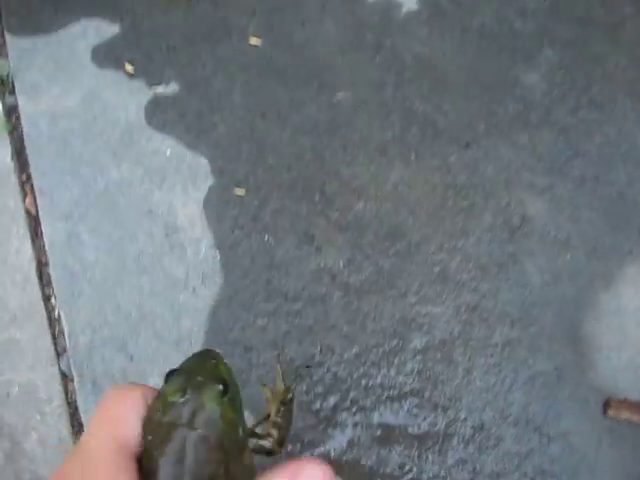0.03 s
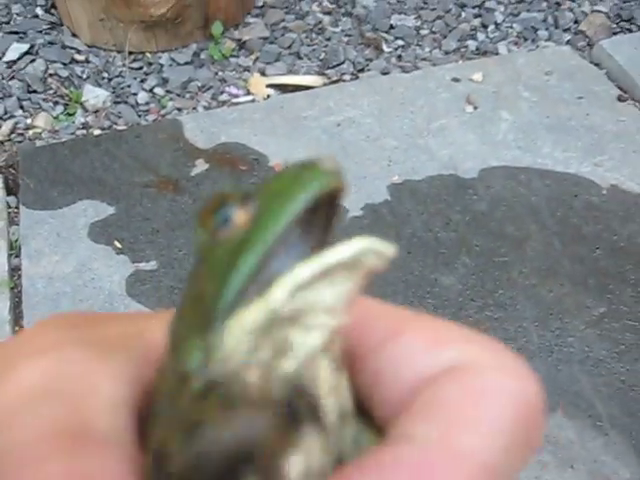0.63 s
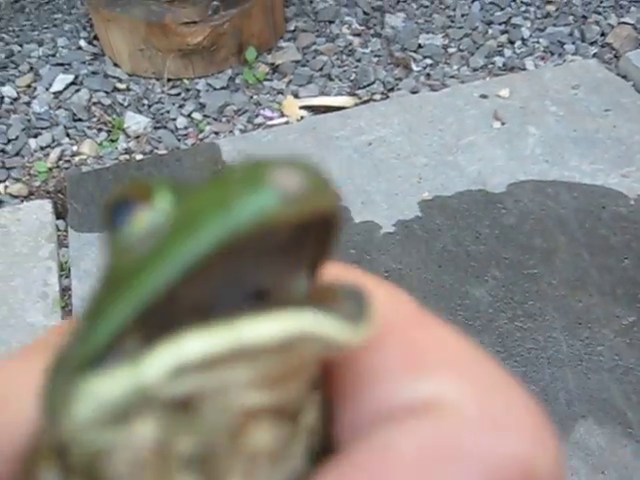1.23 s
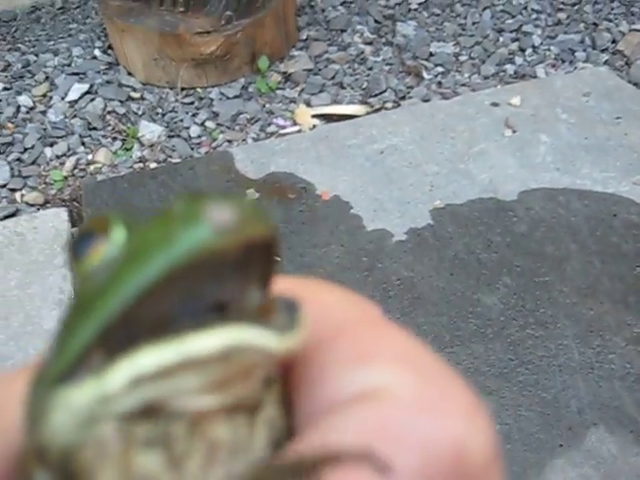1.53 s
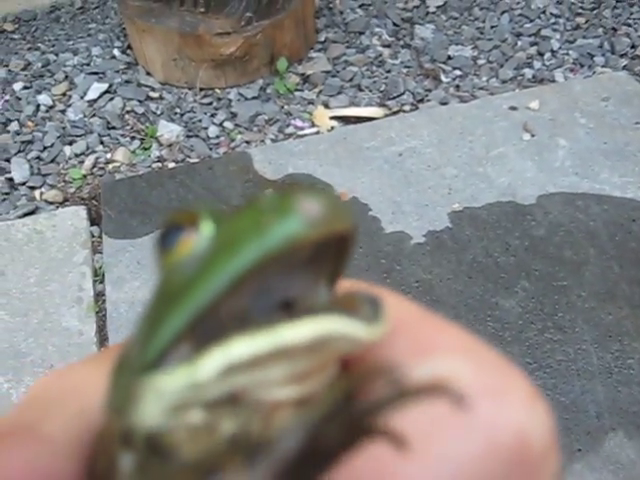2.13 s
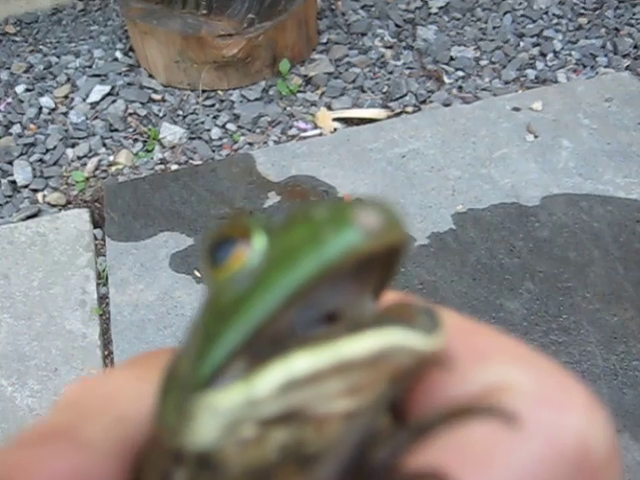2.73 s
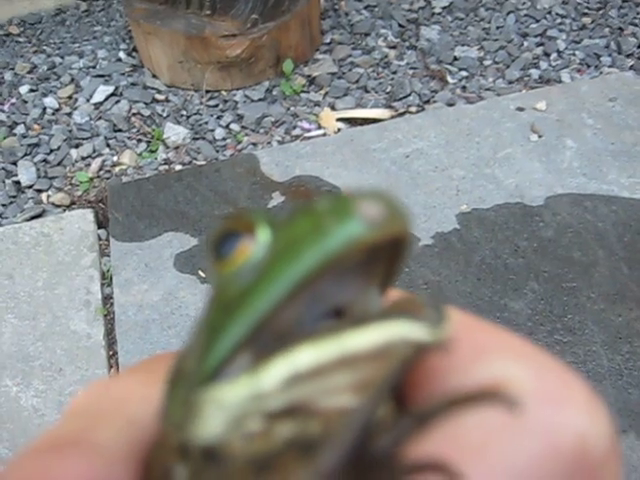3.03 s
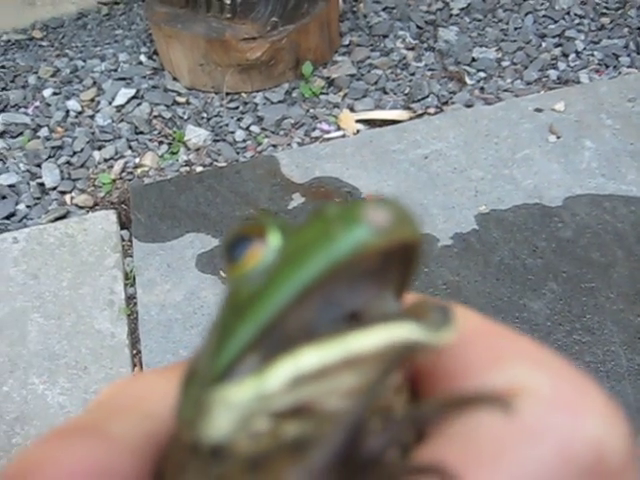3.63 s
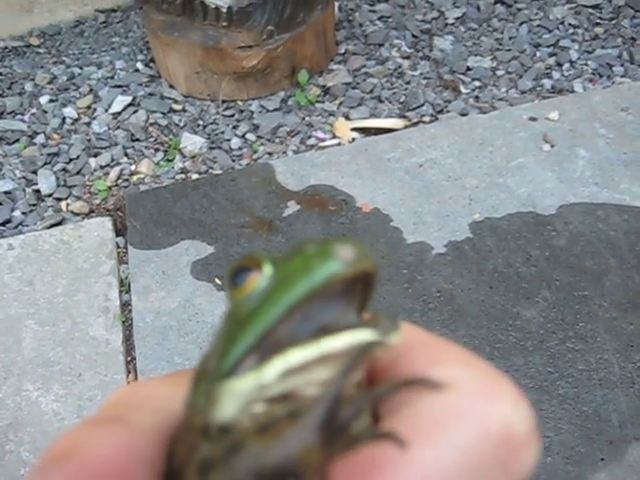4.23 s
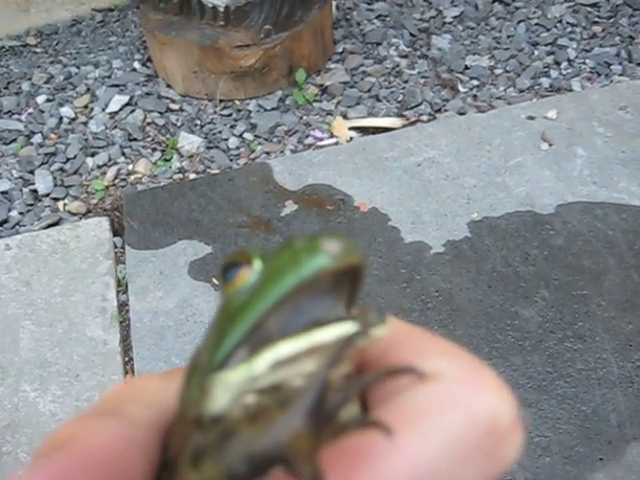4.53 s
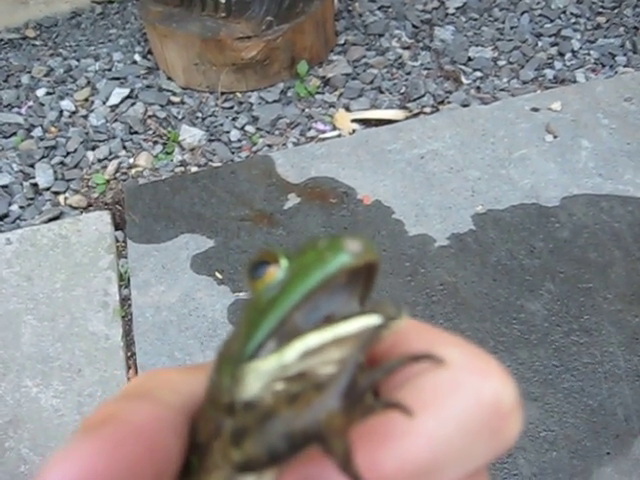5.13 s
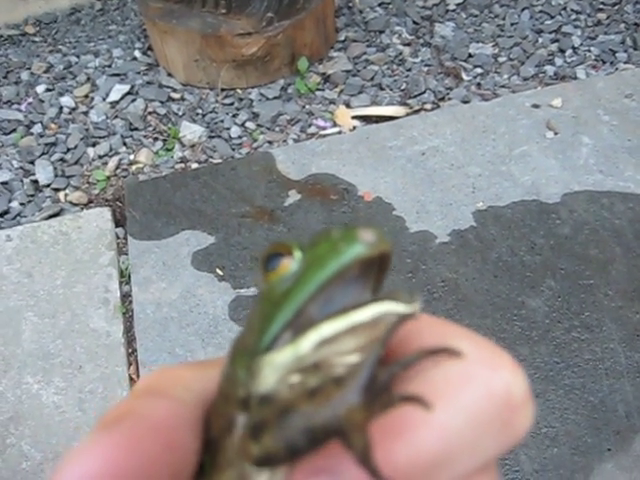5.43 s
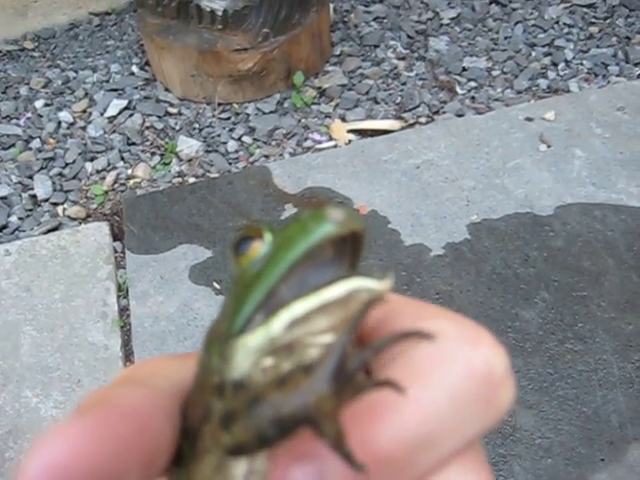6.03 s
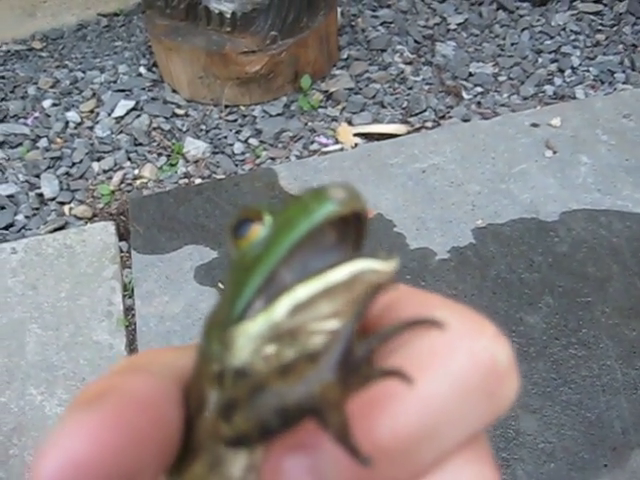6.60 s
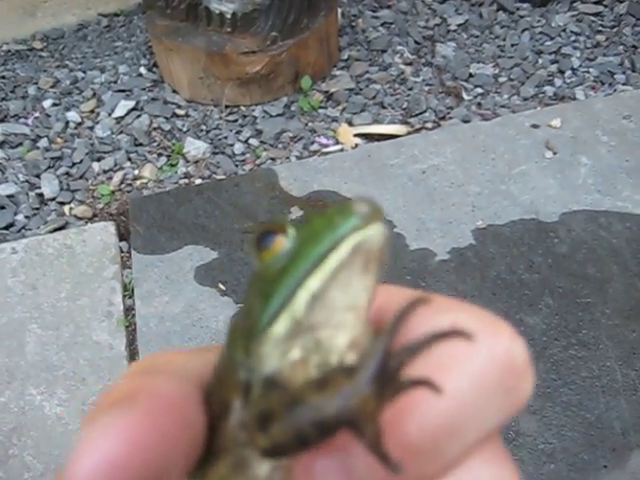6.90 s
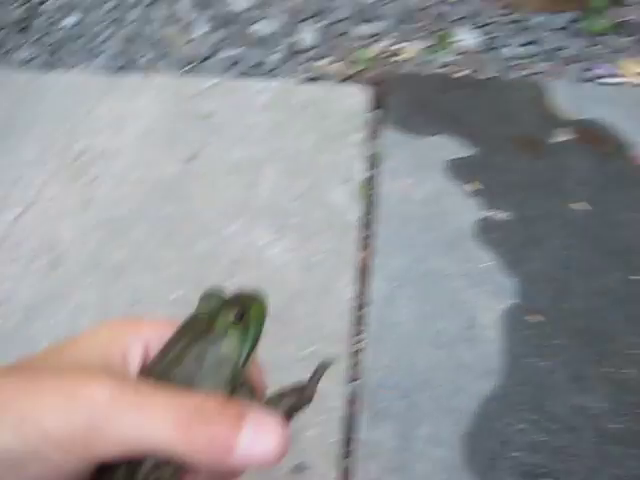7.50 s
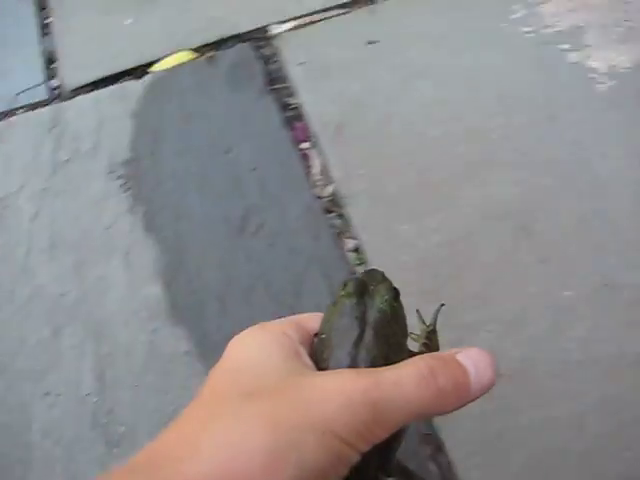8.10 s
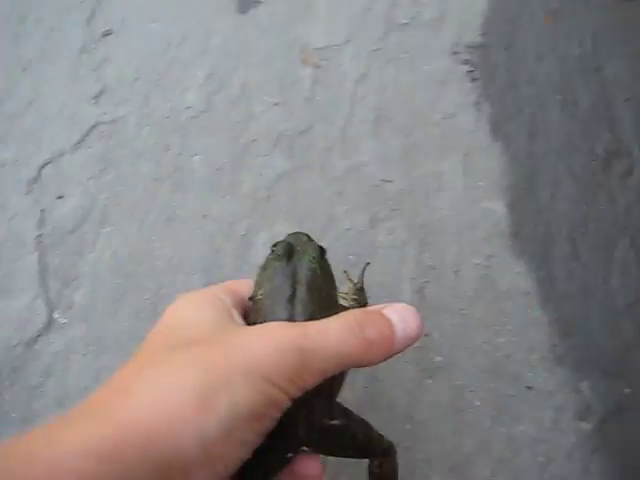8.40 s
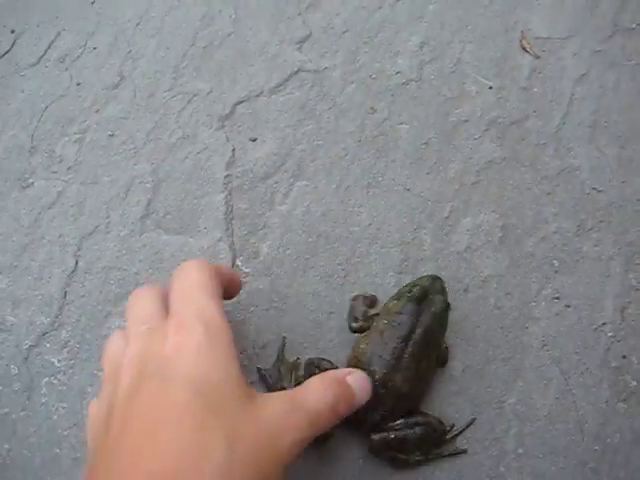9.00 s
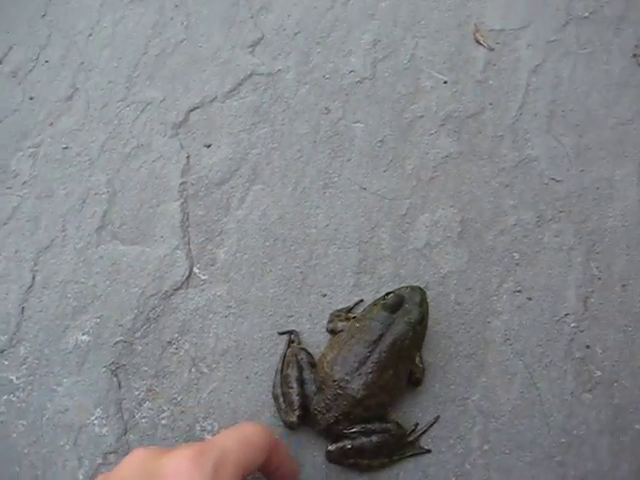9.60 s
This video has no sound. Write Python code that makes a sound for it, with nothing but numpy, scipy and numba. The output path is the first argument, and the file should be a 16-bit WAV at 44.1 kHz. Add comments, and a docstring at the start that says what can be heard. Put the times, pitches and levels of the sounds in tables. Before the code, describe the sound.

A frog held close to the microphone screams loudly from the start, outdoors with almost no echo. Until about 1.8 seconds it is a shrill, wavering wail broken by short rasps. Surging yelps follow, each arching up in pitch, loudest between 2 and 2.7 seconds. From about 3 seconds the cry becomes a lower, buzzing rattle. It lifts again around 5.5 seconds, gives a few quick yelps after 6, sags to a creak and ends in a thin squeak at 6.5 seconds. Faint open-air hiss and a low drone remain. From 7 seconds shoes scuff on stone slabs with small cracks of grit. Between 8.2 and 8.7 seconds the microphone takes a cluster of dull knocks with a low handling rumble. A brief, sharper scrape comes at about 9.3 seconds, along with a few more soft bumps.

```python
"""A hand-held frog screams close to a camera on a stone patio, over open air and a low drone.
Its larynx snaps in a pulse train that rings the throat: first a wail broken by rasps, from 1.8 s
surging yelps, then a rattle that sags to a creak and ends in a squeak at 6.5 s.
From 7 s shoes scuff the slabs; from 8.2 s the camera is bumped as the frog is set down."""
import sys
import numpy as np
from scipy import signal
from scipy.io import wavfile
from scipy.ndimage import uniform_filter1d
from numba import njit

SR = 44100
rng = np.random.default_rng(int(sys.argv[2]) if len(sys.argv) > 2 else 0)


def materialize(psi):
    """Save the field psi as 16-bit PCM at rate SR to the path in sys.argv[1].

    A 1-D psi becomes a single channel; in a 2-D psi each row is a channel.
    """
    bounded = np.clip(np.atleast_2d(psi).T, -1, 1)
    quanta = np.round(bounded * 32767).astype(np.int16)
    wavfile.write(sys.argv[1], SR, quanta)


N = 429975
TIME = np.arange(N) / SR


def amp(db):
    """Decibels to gain."""
    return 10 ** (np.asarray(db) / 20)


def unit(x):
    """Scale to rms 1."""
    return x / np.sqrt(np.mean(x ** 2) + 1e-20)


def curves(rows):
    """Each column of a time table, at every sample."""
    times, *columns = np.transpose(rows)
    return [np.interp(TIME, times, column) for column in columns]


def colour(x, spectrum):
    """Minimum-phase filter from (frequency [Hz], gain [dB]) points."""
    hz, db = np.transpose(spectrum)
    bins_hz = abs(np.fft.fftfreq(4096, 1 / SR))
    log_gain = np.log(amp(np.interp(np.log(bins_hz + 1), np.log(hz), db)))
    taps = np.fft.ifft(np.exp(np.conj(signal.hilbert(log_gain)))).real
    return signal.oaconvolve(x, taps[:len(taps) // 2])[:N]


def noise(spectrum):
    """Coloured noise, rms 1."""
    return unit(colour(rng.standard_normal(N), spectrum))


def wander(per_s):
    """Random drift, rms 1."""
    return unit(np.interp(TIME * per_s, np.arange(N), rng.standard_normal(N)))


def tone(hz):
    """Sine following a frequency curve."""
    return np.sin(2 * np.pi * np.cumsum(hz) / SR)


@njit
def one_pole(x, pole):
    """Time-varying complex one-pole filter, real part."""
    out, state = np.zeros(len(x)), 0j
    for i in range(len(x)):
        state = pole[i] * state + x[i] + 1e-18
        out[i] = state.real
    return out


def resonate(x, hz, width_hz):
    """Moving resonance, peak gain about 1."""
    radius = np.exp(-np.pi * abs(width_hz) / SR)
    return 2 * one_pole((1 - radius) * x, radius * np.exp(2j * np.pi * hz / SR))


def steady(x, band_hz, window=1200):
    """Hold the running in-band rms at 1."""
    band = signal.sosfilt(signal.butter(3, band_hz, "band", fs=SR, output="sos"), x)
    power = abs(uniform_filter1d(uniform_filter1d(band ** 2, window), window))
    return x / np.sqrt(power + 1e-4 * power.mean())


def clicks(times_s, sizes):
    """Band-limited impulses at exact times."""
    at = np.floor(times_s * SR).astype(int)[:, None] + np.arange(-8, 9)
    offset = at - times_s[:, None] * SR
    shape = np.sinc(offset) * np.cos(np.pi * offset / 18) ** 2
    return np.bincount(np.clip(at, 0, N - 1).ravel(), (sizes[:, None] * shape).ravel(), N)


# Air hiss (time [s], level [dB])
AIR_LEVEL = [(0, -42.5), (.5, -65), (2, -70), (4, -53), (6.5, -57.5), (7.5, -48.5), (8.7, -44),
             (9.75, -47.5)]
# Air spectrum (frequency [Hz], gain [dB])
AIR_SPECTRUM = [(35, -35), (60, -5.5), (108, -9), (338, -13), (389, -12.5), (1310, -12.5), (1740, -12.5),
                (3040, -17.5), (11000, -25.5), (14900, -31), (16000, -39)]


def open_air():
    """Broad outdoor hiss, low under the wail."""
    return amp(curves(AIR_LEVEL)[0]) * noise(AIR_SPECTRUM)


# Low background drone, rising from about 4 s and dipping briefly at 5.55 s (time [s], base level [dB])
LOW_DRONE_LEVEL = [(.1, -56), (.6, -80), (1.7, -69.5), (2.4, -64.5), (3, -65), (4.2, -52.5), (5.3, -50),
                   (5.55, -67), (6, -50.5), (7.4, -50.5), (8.1, -42), (8.42, -48.5), (8.55, -60)]
# Drone spectrum (frequency [Hz], gain [dB])
LOW_DRONE_SPECTRUM = [(20, -7.5), (75, -5), (110, -11), (170, -5), (300, -9.5), (380, -2.5), (440, 2),
                      (540, -4), (900, -6.5), (1300, -4.5), (2200, -7.5), (2500, -6.5), (2650, -3.5),
                      (2900, -9), (5000, -9.5), (12000, -20.5)]


def low_drone(rumble_db=4.5, hum_hz=73.3, hum_db=-11):
    """Background rumble plus an unsteady hum."""
    hum = amp(hum_db + 2 * wander(8.9)) * tone(hum_hz * (1 + .04 * wander(9.2)))
    rumble = amp(rumble_db) * noise(LOW_DRONE_SPECTRUM)
    return amp(curves(LOW_DRONE_LEVEL)[0]) * (rumble + hum)


def camera_whine(hz=15140, drift_hz=18, level_db=-65):
    """The camera's thin, wavering tone."""
    return amp(level_db) * tone(hz + drift_hz * wander(60))


# Grip rumble (time [s], level [dB])
GRIP_LEVEL = [(8.15, -90), (8.23, -42.5), (8.75, -44.5), (9.05, -58), (9.27, -44.5), (9.5, -54.5)]
# Rumble spectrum (frequency [Hz], gain [dB])
GRIP_SPECTRUM = [(20, -12), (55, 1), (115, 2), (200, -8), (350, -34), (800, -60)]
# Hand knocks (time [s], peak [dB], settled pitch [Hz])
KNOCKS = [(8.254, -30, 90), (8.333, -27, 139), (8.35, -21, 85), (8.404, -25, 175), (8.468, -25, 111),
          (8.512, -21.5, 138), (8.521, -23, 169), (8.597, -26, 130), (8.627, -26, 114), (8.675, -30, 120),
          (9.223, -34, 119), (9.408, -29, 125), (9.446, -24, 120)]


def handling(rise_s=0.0028, sag=0.4):
    """Heavily damped knocks of the camera body over the rumble of the grip."""
    out = amp(curves(GRIP_LEVEL)[0] + 1.9 * wander(25)) * noise(GRIP_SPECTRUM)
    for start_s, db, hz in KNOCKS:
        t = np.clip(TIME - start_s, 0, .1)
        swell = t / rise_s * np.exp(1 - t / rise_s)
        cycles = hz * (t + sag * rise_s * (1 - np.exp(-t / rise_s)))
        out += amp(db) * swell * np.sin(2 * np.pi * cycles)
    return out


# Soles and clothes sliding (peak time [s], swell [s], fade [s], level [dB])
SLIDES = [(7.15, 0.052, 0.1, -41), (7.47, 0.047, 0.095, -43.5), (7.61, 0.034, .04, -31),
          (7.72, 0.067, 0.12, -30.5), (7.985, 0.16, 0.052, -30), (8.22, 0.19, 0.15, -38),
          (8.42, 0.069, 0.027, -44.5), (8.78, 0.12, .02, -42), (8.98, 0.11, .05, -49.5),
          (9.283, 0.045, 0.021, -22.5), (9.46, .03, .03, -49)]
# Grit cracks (time [s], level [dB])
CRACKS = [(7.703, -29), (8.335, -38), (8.43, -32), (8.737, -47)]
# Friction spectrum (frequency [Hz], gain [dB])
SCUFF_SPECTRUM = [(530, -52), (900, -13.5), (1920, -3), (2860, -7.5), (3340, -1.5), (5890, 0.5),
                  (8660, -3.5), (9530, -5.5), (13700, -7.5), (15100, -12), (16000, -25)]


def scuffs(grain_db=1.5, lumps_db=1.75, crack_decay_s=0.0018):
    """Swells of sliding friction, with grit cracking underfoot."""
    power = np.zeros(N)
    for peak_s, swell_s, fade_s, db in SLIDES:
        width_s = np.where(TIME < peak_s, swell_s, fade_s)
        power += (amp(db) * np.exp(-((TIME - peak_s) / width_s) ** 2)) ** 2
    sliding = np.sqrt(power) * amp(grain_db * wander(900) + lumps_db * wander(60))
    grit = sum(amp(db) * (TIME > s) * np.exp(-abs(TIME - s) / crack_decay_s) for s, db in CRACKS)
    return (sliding + grit) * noise(SCUFF_SPECTRUM)


def patio(x, slab_delay_s=.0023, slab_db=-23, tail_db=-27, t60_s=0.2):
    """Direct sound, one slab reflection and a faint tail."""
    t = TIME[:SR // 2]
    response = rng.standard_normal(len(t)) * amp(-60 * t / t60_s) * (t > .004)
    tail = signal.oaconvolve(x, response / np.linalg.norm(response))[:N]
    echo = np.interp(TIME - slab_delay_s, TIME, x)
    return x + amp(slab_db) * echo + amp(tail_db) * tail


# Squeak partials (harmonic [n], level [dB], t60 [s])
SQUEAK_PARTIALS = [(1, -29.5, 0.13), (2, -37, 0.13), (3, -32, 0.11), (4, -28, 0.078)]


def squeak(start_s=6.484, hz=1275, bend=0.15, settle_s=0.012, attack_s=0.0022):
    """The folds ring on as a thin tone that bends up and dies."""
    t = np.maximum(TIME - start_s, 0)
    pitch_hz = hz * (1 - bend * np.exp(-t / settle_s))
    partials = sum(amp(db - 60 * t / t60_s) * tone(k * pitch_hz) for k, db, t60_s in SQUEAK_PARTIALS)
    return np.minimum(t / attack_s, 1) * partials


# Yelps (start [s], length [s], pitch lift [octaves], level lift [dB])
SQUEEZES = [(1.808, 0.227, 0.99, 5.5), (2.088, 0.281, 1.25, 11.5), (2.385, 0.314, 1.21, 12),
            (2.792, 0.199, 0.46, 1.5), (3.014, 0.174, 0.21, 2), (5.283, 0.444, 0.61, 0.5),
            (6.018, 0.159, 0.96, 4.5), (6.113, 0.23, 1.42, 5.9), (6.369, 0.135, 1.73, 6.5)]


def yelps(skew=1.466, pitch_power=.911, level_power=0.66):
    """Extra squeezes lift pitch and level in arches; pitch peaks late."""
    octaves, db = np.zeros(N), np.zeros(N)
    for start_s, length_s, lift_octaves, lift_db in SQUEEZES:
        inside = (TIME > start_s) & (TIME < start_s + length_s)
        progress = (TIME[inside] - start_s) / length_s
        octaves[inside] += lift_octaves * np.sin(np.pi * progress ** skew) ** pitch_power
        db[inside] += lift_db * np.sin(np.pi * progress) ** level_power
    return octaves, db


# Rasps (start [s], end [s])
RASP_SPANS = [(.303, .328), (.392, .408), (.463, .517), (.628, .67), (.715, .77), (.83, .885), (.926, .95),
              (1.018, 1.044), (1.06, 1.087), (1.275, 1.323), (1.412, 1.46), (1.53, 1.55), (1.608, 1.629),
              (1.76, 1.795), (1.888, 1.927), (2.21, 2.226), (2.556, 2.575)]


def fold_chaos(share=0.7):
    """Chaotic share of the treble as the folds break into rasps."""
    rasping = sum(1. * ((TIME > start_s) & (TIME < end_s)) for start_s, end_s in RASP_SPANS)
    return share * uniform_filter1d(rasping, size=250)


# Base snap rate, set by larynx tension (time [s], rate [Hz])
SNAP_RATE = [(.005, 511), (.108, 316), (.126, 378), (.194, 442), (.204, 371), (.312, 748), (.415, 685),
             (.507, 502), (.617, 515), (.675, 585), (.835, 480), (.917, 398), (.95, 443), (1.022, 449),
             (1.056, 380), (1.135, 512), (1.28, 445), (1.335, 398), (1.365, 402), (1.44, 364), (1.468, 372),
             (1.528, 338), (1.602, 360), (1.643, 323), (1.812, 294), (2.04, 223), (2.315, 154), (2.73, 158),
             (3.04, 237), (3.3, 185), (3.55, 151), (3.79, 173), (3.863, 159), (4.11, 164), (4.212, 153),
             (4.472, 154), (4.561, 120), (4.65, 146), (5.12, 147), (5.21, 170), (5.29, 148), (5.48, 187),
             (5.62, 190), (5.8, 212), (5.944, 159), (6.009, 93), (6.177, 120), (6.353, 51), (6.49, 95)]
# Snap unevenness (time [s], period spread [ratio])
JITTER = [(.25, .015), (.34, .004), (3.2, .004), (3.6, .018), (4.4, .012), (4.6, .04), (5.4, .035),
          (5.5, .004), (6.1, .02), (6.35, .005)]
# Second closure in each cycle (time [s], lag [s], size [ratio])
SECOND_SNAP = [(.1, 0.00088, 0.24), (.2, .0012, 0.23), (.28, 0.00074, 0.0053), (6.45, .0014, 0.014),
               (6.465, 0.0014, 0.83)]


def larynx(lift_octaves, chaos, glide_s=0.012, quaver=.005, rasp_sag=.015, shimmer=5.6,
           lone_snap_s=6.359, scatter_s=0.000102, hiss_db=-25, rasp_from_hz=4500):
    """The folds snap shut and air puffs through; returns bare snaps, airy snaps and rasp."""
    (jitter,), (lag_s, rebound) = curves(JITTER), curves(SECOND_SNAP)
    sounding = TIME < SNAP_RATE[-1][0]
    rate_hz = uniform_filter1d(curves(SNAP_RATE)[0], int(glide_s * SR)) * 2 ** lift_octaves
    rate_hz *= (1 + quaver * wander(28)) * (1 - rasp_sag * chaos)
    cycles = np.cumsum(rate_hz * (1 + jitter * (wander(200) + .25 * wander(14)))) / SR
    cycles -= np.interp(lone_snap_s, TIME, cycles) % 1  # one snap lands at the bottom of the creak
    times_s = np.interp(np.arange(1, cycles[sounding][-1]), cycles, TIME)
    at = (times_s * SR).astype(int)
    puffs = np.exp(-2 * (cycles % 1)) * 2 * rng.standard_normal(N) * sounding
    spread, slip = rng.standard_normal((N, 2))[:len(at)].T
    sizes = np.exp(shimmer * jitter[at] * np.tanh(spread)) / np.sqrt(rate_hz[at] / SR)
    snaps = clicks(times_s, sizes) + clicks(times_s + lag_s[at], sizes * rebound[at])
    # rasp: the cycle keeps time, the treble is struck out of step
    stray = clicks(times_s + scatter_s * slip, sizes) + 0.92 * puffs
    highpass = signal.butter(6, rasp_from_hz, "high", fs=SR, output="sos")
    rasp = signal.sosfiltfilt(highpass, chaos * (stray - snaps) + 1e-18)
    return snaps, snaps + amp(hiss_db) * puffs, rasp


# Open-mouth resonance (time [s], centre [Hz], width per stage [Hz])
THROAT_RESONANCE = [(0, 2920, 703), (.1, 3980, 900), (.18, 4550, 1350), (.33, 5000, 1800), (.6, 4930, 1130),
                    (1.2, 5180, 1510), (2.3, 5115, 1468), (2.9, 4830, 1725), (3.6, 5300, 2033),
                    (4.6, 5690, 1501), (5.3, 5600, 1600), (5.48, 4740, 2290), (5.7, 4840, 2500),
                    (5.87, 5470, 1520), (6.22, 4500, 2580)]
# Ring spectrum (frequency [Hz], gain [dB])
RING_SPECTRUM = [(400, -61), (1500, -8.5), (2600, 0.5), (3500, 4.5), (4500, 3), (5600, 3), (6100, -4),
                 (6700, -9.5), (9000, -14)]


def throat(pulses, shut, shut_hz=5010, shut_width_hz=990):
    """Two-stage throat resonance; shutting the mouth narrows it."""
    open_hz, open_width_hz = curves(THROAT_RESONANCE)
    hz = open_hz + shut * (shut_hz - open_hz)
    width_hz = open_width_hz + shut * (shut_width_hz - open_width_hz)
    ring = resonate(resonate(pulses, hz, width_hz), hz, width_hz)
    return steady(colour(ring, RING_SPECTRUM), (3000, 6500))


# Treble relative to effort, mouth open (time [s], edge [dB], sizzle [dB])
TREBLE_LEVELS = [(0, -13, -7.5), (.2, -6, -9.5), (.48, -6, -4.5), (.66, -16, -16.5), (1.5, -19.5, -15.5),
                 (2.7, -19, -14), (3.4, -15.5, -11), (5.2, -14, -9.5), (5.72, -14, -8), (6.1, -13.5, -12),
                 (6.24, -14.5, -9.5), (6.49, -13, -14)]
# Edge spectrum (frequency [Hz], gain [dB])
EDGE_SPECTRUM = [(3000, -66), (5500, -4), (6600, -3.5), (7600, 1), (8400, -1.5), (9400, 0), (10200, -1.5),
                 (11000, -3.5), (13000, -14)]
# Sizzle spectrum (frequency [Hz], gain [dB])
SIZZLE_SPECTRUM = [(8000, -63), (11000, -28), (11700, -0.5), (12400, 7.5), (12900, 2), (13600, -1),
                   (14500, -9), (15400, -7.5), (16500, -6)]


def treble(pulses, shut, notch_hz, notch_width_hz, peak_hz=10040, drift_hz=350,
           flat_at_db=-15, flicker_db=0.7, shut_db=-8):
    """Bright edge and top sizzle of the voice, notched and dulled as the mouth shuts."""
    for multiple in (1.72, 2.54, 3.15):
        pulses = pulses - shut * resonate(pulses, multiple * notch_hz, notch_width_hz)
    edge_db, sizzle_db = curves(TREBLE_LEVELS)
    boost = np.clip(.12 * (edge_db - flat_at_db), -1, 1)  # strong edge: peak; weak edge: hollow
    pulses = pulses + boost * resonate(pulses, peak_hz + drift_hz * wander(4), width_hz=1000)
    edge = amp(edge_db + flicker_db * wander(12)) * steady(colour(pulses, EDGE_SPECTRUM), (7000, 10500))
    sizzle = amp(sizzle_db) * steady(colour(pulses, SIZZLE_SPECTRUM), (11500, 15500))
    return amp(shut_db * shut ** 2) * (edge + sizzle)


# Lung push (time [s], base ring level [dB])
LUNG_EFFORT = [(0, -33.5), (.08, -23.5), (.28, -22), (.47, -29.5), (.53, -25.5), (.72, -23.5), (.9, -24.5),
               (1.18, -19.5), (1.8, -26.5), (1.98, -24), (2.06, -28.5), (2.38, -30.5), (2.74, -30.5),
               (2.8, -22.5), (3.04, -24), (4.7, -24), (5.35, -22), (5.6, -26.5), (5.7, -30), (5.91, -22),
               (6.04, -28.5), (6.12, -25.5), (6.25, -31), (6.38, -31.5), (6.49, -28.5)]
# Mouth closure (time [s], shut [0-1])
MOUTH_SHUT = [(3.5, 0.19), (4.7, 0.42), (5.1, 0.49), (5.33, 0.91), (5.45, 0.02), (5.88, 0.07), (6, 1),
              (6.11, 0.91), (6.19, 0.38), (6.27, 0.4), (6.32, 0.95), (6.49, 1)]
# Dry snap, growing from wail to rattle (time [s], base level [dB])
DRY_SNAP_LEVEL = [(0.0, -42.5), (0.32, -43), (0.4, -48.5), (0.7, -49.5), (1.16, -48), (1.63, -50.5),
                  (1.68, -53.5), (1.97, -45.5), (2.02, -49), (2.24, -42.5), (2.37, -47), (2.44, -38.5),
                  (2.69, -47.5), (2.78, -37), (2.96, -44), (3.54, -34), (5.39, -31), (5.48, -40.5),
                  (6.14, -31), (6.36, -40.5), (6.44, -28), (6.49, -36.5)]
# Dry snap spectrum (frequency [Hz], gain [dB])
DRY_SNAP_SPECTRUM = [(100, -29.5), (450, -30), (620, -13.5), (780, -7), (1300, -4), (2100, -1.5),
                     (3500, 2.5), (4400, -1.5), (6000, -18), (9000, -22.5)]


def scream(tremble_db=0.74, snap_trim_db=0.2, db_per_chaos=-2.5,
           notch_open_hz=5120, notch_shut_hz=3310, notch_width_hz=1290, notch_depth=0.96):
    """Lung-driven larynx snaps, heard dry, through the ringing throat and as bright treble."""
    lift_octaves, lift_db = yelps()
    effort_db = curves(LUNG_EFFORT)[0] + lift_db + tremble_db * wander(30)
    shut = curves(MOUTH_SHUT)[0]
    chaos = fold_chaos()
    snaps, airy, rasp = larynx(lift_octaves, chaos)
    ring = amp(db_per_chaos * chaos) * throat(airy + rasp, shut)
    snap_db = curves(DRY_SNAP_LEVEL)[0] + snap_trim_db - effort_db
    body = ring - amp(snap_db) * steady(colour(snaps, DRY_SNAP_SPECTRUM), (700, 2500))
    # the closing jaw drags a row of notches down the spectrum
    notch_hz = notch_open_hz + shut * (notch_shut_hz - notch_open_hz)
    body -= notch_depth * shut * resonate(body, notch_hz, notch_width_hz)
    top = treble(airy + 0.93 * rasp, shut, notch_hz, notch_width_hz)
    return amp(effort_db) * (body + top)


def scene():
    """All sources at one microphone, identical in both channels."""
    frog = patio(scream() + squeak())
    mix = frog + handling() + open_air() + low_drone() + camera_whine() + scuffs()
    return np.tile(mix, (2, 1))


def record(dry):
    """The camera's band limit."""
    cutoff_hz = 16100
    lowpass = signal.firwin(401, cutoff_hz, window=("kaiser", 8), fs=SR)
    return signal.oaconvolve(dry, lowpass[None], "same")


dry = scene()
out = record(dry)
materialize(out)
```